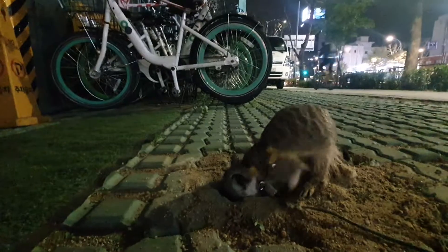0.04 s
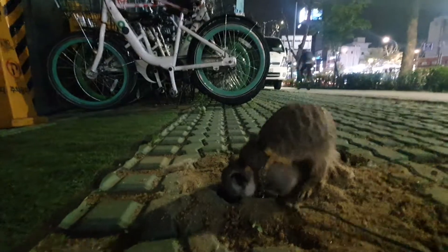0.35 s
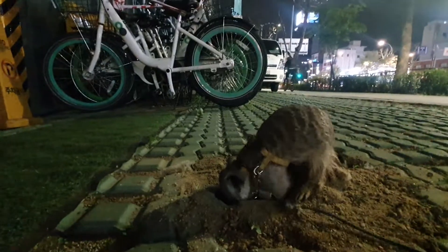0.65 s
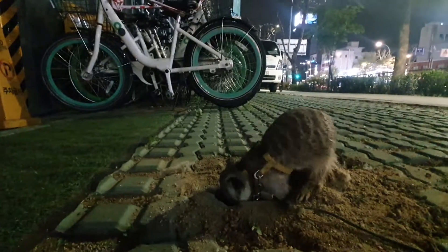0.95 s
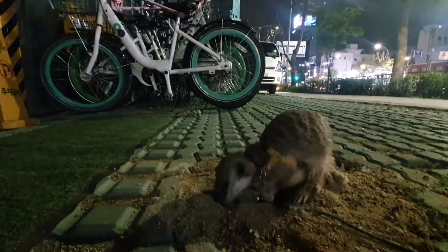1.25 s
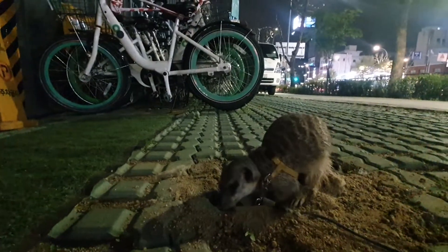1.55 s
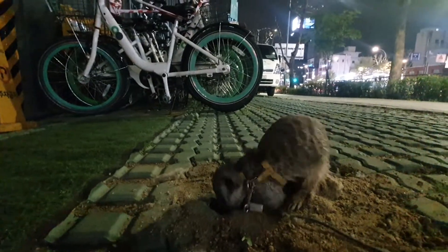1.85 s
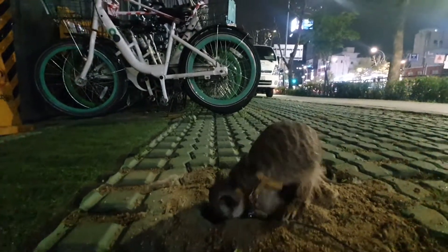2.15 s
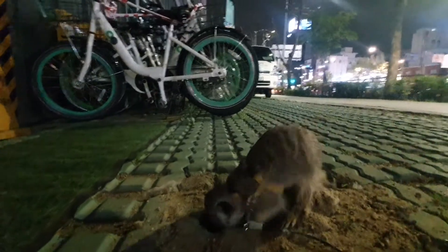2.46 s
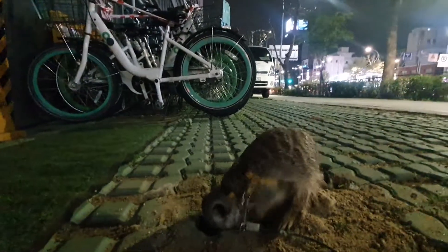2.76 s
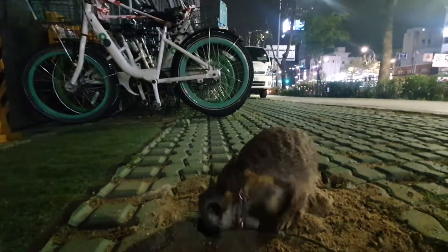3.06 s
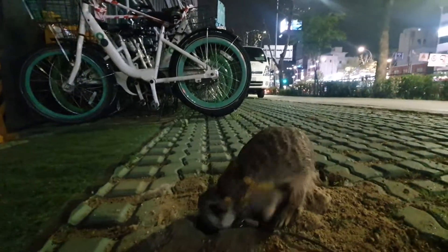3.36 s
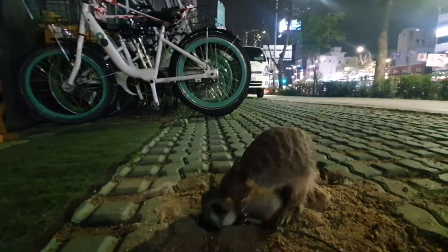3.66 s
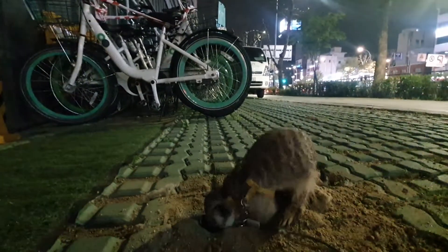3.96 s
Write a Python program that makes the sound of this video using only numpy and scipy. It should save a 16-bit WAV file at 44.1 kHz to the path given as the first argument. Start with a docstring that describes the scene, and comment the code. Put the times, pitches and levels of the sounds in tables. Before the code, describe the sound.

A meerkat digs in sand close by, slightly to the right, with soft, irregular paw sweeps and ticking grit. It gives three short, soft, arching calls at about 0.9, 1.2 and 1.5 seconds. Small clods crunch from 1.6 seconds, and the digging grows busier from 3 seconds, with the strongest claw scrapes near the end. A harness clip occasionally tinkles faintly. Distant traffic and a low, wavering engine drone continue throughout.

```python
"""A meerkat digs in a patch of sand close to a stereo microphone, beside a city street at night.
It gives three short, soft calls that arch in pitch and echo briefly off the paving and a wall.
Its paws sweep the sand, its claws scrape, flick grit and break clods, and its harness clip tinkles.
Distant traffic and a low engine drone lie under everything."""
import sys
import numpy as np
from scipy import signal
from scipy.fft import rfft, irfft
from scipy.io import wavfile
from scipy.ndimage import uniform_filter1d

SR = 44100
rng = np.random.default_rng(int(sys.argv[2]) if len(sys.argv) > 2 else 0)


def transcribe(signal):
    """Save signal, clipped to [-1, 1], as a 16-bit WAV file at the path in sys.argv[1]."""
    frames = np.atleast_2d(signal).T
    limited = np.clip(frames, -1, 1)
    pcm = np.round(limited * 32767).astype(np.int16)
    wavfile.write(sys.argv[1], SR, pcm)


N = 176400
TIME = np.arange(N) / SR
SAND_LIKENESS = 0.16  # left-right correlation of grains and snaps

# Tone of fine sand, swept or trickling: frequency_hz, gain_db
FINE_SAND_TONE = [(300, -51), (2000, -15), (5000, -12), (9000, -9), (10500, -4), (12000, -3), (14000, -4),
                  (16000, 3)]


def amp(db):
    """Decibels to gain."""
    return 10 ** (np.asarray(db) / 20)


def unit(x):
    """Scales to rms 1."""
    return x / np.sqrt(np.mean(x ** 2) + 1e-20)


def read(points, hz):
    """Reads a spectrum on a log-frequency axis."""
    f, value = np.transpose(points)
    return np.interp(np.log(hz + 1), np.log(f + 1), value)


def colour(x, points):
    """Minimum-phase filter of energy 1 with the given spectral shape."""
    gain = amp(read(points, abs(np.fft.fftfreq(2048, 1 / SR))))
    response = np.exp(np.conj(signal.hilbert(np.log(gain))))
    taps = np.fft.ifft(response).real[:1024]
    return signal.oaconvolve(x, taps[None] / np.linalg.norm(taps), axes=1)[:, :N]


def pan(side_db):
    """Left and right gains of mean power 1; side_db is left minus right."""
    gains = amp(np.array([np.atleast_1d(side_db), -np.atleast_1d(side_db)]) / 2)
    return gains / np.sqrt((gains ** 2).mean(0))


def pair(noise, likeness):
    """Gives two unrelated channels the correlation `likeness`."""
    c = np.clip(likeness, -1, 1)
    return np.array([noise[0], c * noise[0] + np.sqrt(1 - c ** 2) * noise[1]])


def drift(rate_hz):
    """Smooth random wander of rms 1."""
    lowpass = np.exp(-(np.fft.rfftfreq(N, 1 / SR) / rate_hz) ** 2)
    return unit(irfft(rfft(rng.standard_normal(N)) * lowpass, N))


def gate(start, length, rise_s, fall_s):
    """Smooth attack, hold and release."""
    attack = np.sin(np.pi / 2 * np.clip((TIME - start) / rise_s, 0, 1))
    release = np.sin(np.pi / 2 * np.clip((start + length - TIME) / fall_s, 0, 1))
    return attack * release


def traffic():
    """Distant traffic: a dull wash with drifting patches, alike in both channels only in the bass."""
    tone = [(20, -27), (36, -10), (50, 4), (75, 3), (110, -3), (170, -9), (230, -5), (330, -12.5),
            (420, -16), (620, -17.5), (850, -22), (1200, -25.5), (2200, -30.5), (3200, -38), (5000, -45),
            (8000, -53.5), (16000, -39.5)]  # street spectrum: frequency_hz, gain_db
    likeness = [(30, 0.95), (70, 0.96), (170, 0.96), (350, 0.74), (700, 0.22), (1400, -0.43), (3000, 0.035),
                (16000, -0.94)]  # left-right likeness: frequency_hz, correlation
    sides = [(100, 0), (350, 0.5), (700, -1), (1400, -3), (2800, -7), (8000, -4), (16000, 9)]  # stereo balance: frequency_hz, side_db
    hz = np.fft.rfftfreq(4096, 1 / SR)
    real, imag = rng.standard_normal((2, 2, N // 1024 + 5, len(hz)))
    slow_noise = uniform_filter1d(rng.standard_normal(real.shape[1:]), size=5, axis=0)
    patches_db = unit(uniform_filter1d(slow_noise, size=30, axis=1))
    noise = pair(real + 1j * imag, read(likeness, hz))
    frames = noise * pan(read(sides, hz))[:, None] * amp(read(tone, hz) + patches_db)
    wash = signal.istft(frames.transpose(0, 2, 1), nperseg=4096, noverlap=3072)[1][:, :N]
    return amp(-43) * unit(wash)


def engine_drone():
    """A low engine note that wavers in pitch and level."""
    levels = [(0.0, -48), (0.36, -38), (0.48, -72), (0.58, -37), (0.83, -61), (1.1, -34.5), (1.45, -41.5),
              (1.74, -30), (1.8, -43), (1.96, -31.5), (2.04, -47), (2.1, -33), (2.43, -38.5), (3.27, -41),
              (3.42, -32), (3.52, -42.5), (4.0, -43.5)]  # swells of the engine: time_s, relative_level_db
    pitch_hz = 54.67 * (1 + 0.056 * drift(13.2))
    phase = 2 * np.pi * np.cumsum(pitch_hz) / SR
    level_db = np.interp(TIME, *np.transpose(levels)) - 3
    return amp(level_db) * np.sqrt(2) * np.sin(phase)


def harness_clip(decay_s=0.009):
    """The small metal clip of the harness rings briefly, now and then, as the animal moves."""
    tinkles = [(0.137, -58, 10200), (2.333, -58, 9550), (2.842, -59, 9550), (3.521, -52.5, 10300),
               (3.536, -59, 9700)]
    out = np.zeros(N)
    for start, db, hz in tinkles:
        t = TIME[TIME >= start] - start
        out[-len(t):] += amp(db) * np.exp(-t / decay_s) * np.sin(2 * np.pi * hz * t)
    return out


def grains(per_s, spread_db=2.6):
    """Sand grains: random clicks of uneven size in both channels."""
    size = amp(spread_db * np.minimum(rng.exponential(1, N), 5))
    hits = rng.random(N) < per_s / SR
    return unit(size * hits * pair(rng.standard_normal((2, N)), SAND_LIKENESS))


def fine_grains(per_s, width_hz=1100):
    """Fine grains of many sizes, each size ringing for an instant at its own pitch."""
    pitches_hz = np.arange(2500, 15500, width_hz)
    out = np.zeros((2, N))
    for hz in pitches_hz:
        clicks = grains(per_s / len(pitches_hz), spread_db=2.3)
        out += signal.lfilter(*signal.iirpeak(hz, hz / width_hz, SR), clicks)
    return unit(out)


def trickle():
    """A little loose sand keeps trickling, heard between the strokes."""
    levels = [(0, -69), (.6, -65.5), (.8, -71.5), (1.4, -65.5), (1.8, -61.5), (2.4, -69), (2.9, -61),
              (3.2, -63.5), (4, -60.5)]  # flow of loose sand: time_s, level_db
    level_db = np.interp(TIME, *np.transpose(levels)) + 2 * drift(27)
    return colour(amp(level_db) * fine_grains(per_s=4600), FINE_SAND_TONE)


def snap(start, db, side_db, tone, decay_s):
    """One fast-dying burst of fracture noise."""
    t = TIME[:SR // 20]
    fade = np.exp(-t / decay_s)
    burst = colour(fade * pair(rng.standard_normal((2, len(t))), SAND_LIKENESS), tone)
    burst *= np.linalg.norm(fade) / np.linalg.norm(burst, axis=1, keepdims=True)
    placed = np.pad(burst, ((0, 0), (round(start * SR), N)))[:, :N]
    return pan(side_db) * amp(db) * placed


def grit():
    """Claws flick hard grit, which ticks brightly."""
    ticks = [(0.201, -54, 10), (0.22, -54, 9), (0.236, -48, -21), (0.48, -53, 12), (.667, -56, 10),
             (0.674, -52.5, 12), (1.472, -52, -22), (1.675, -45.5, -8), (1.723, -59, -11),
             (1.910, -51, -21), (1.936, -41.5, -15), (1.966, -41.5, -15), (2.055, -44.5, -4),
             (2.0656, -51, -7), (2.078, -50.5, -17), (2.113, -58, -8), (2.154, -54, -14),
             (2.1814, -45.5, 2), (2.5235, -55, 7), (2.531, -52.5, 1), (3.0764, -38.5, -6.5),
             (3.105, -52, 0), (3.239, -54.5, 1), (3.286, -52, 7), (3.3964, -57, -15), (3.7848, -44.5, -9),
             (3.839, -54, -7), (3.844, -54, -7), (3.924, -41, -12), (3.932, -42, -18), (3.9464, -50, -9),
             (3.958, -56, -12)]  # flicked grit: start_s, relative_level_db, side_db
    tone = [(500, -53), (2000, -43), (3500, -12.5), (5500, -14.5), (8000, -12), (10500, -1.5), (12500, -1),
            (16000, -3)]  # spectrum of a tick: frequency_hz, gain_db
    return sum(snap(start, db + 10, side_db, tone, decay_s=0.0012) for start, db, side_db in ticks)


def clods():
    """Claws break small clods, each with its own dull ring."""
    # Breaking clods: start_s, relative_level_db, decay_s, ring_hz, side_db
    crunches = [(1.593, -47.5, 0.0092, 2920, -7), (1.603, -50.5, 0.0048, 3220, -9),
                (1.61, -42.5, 0.0014, 2510, -2), (1.619, -51.5, 0.0085, 3300, -9),
                (1.725, -45.5, 0.0018, 2840, -13), (1.849, -50.5, 0.0037, 3980, -22),
                (1.9426, -46, 0.0016, 3270, -15), (1.9453, -42.5, 0.002, 2400, -14),
                (2.1805, -43, 0.0014, 3900, -3), (2.879, -51, 0.004, 2600, -9),
                (2.887, -46.5, .007, 3150, -10), (3.784, -44.5, 0.0027, 2580, -8),
                (3.789, -47, 0.0041, 2350, -20)]
    tone = [(.1, -12), (.5, -19), (.8, -6), (1, 0.5), (1.25, -11), (1.6, -20.5), (2.4, -26), (6, -30)]  # spectrum of a clod: multiple_of_ring_pitch, gain_db
    return sum(snap(start, db + 1, side_db, np.multiply(tone, [ring_hz, 1]), decay_s)
               for start, db, decay_s, ring_hz, side_db in crunches)


def stroke_power(start, length, db):
    """The power of one paw or claw stroke swells and dies away."""
    return (amp(db) * gate(start, length, rise_s=0.26 * length, fall_s=0.45 * length)) ** 2


def digging(grains_per_s=9000):
    """Close by on the right, paws set clumps of fine and coarse sand sliding and claws scrape."""
    strokes = [(0.095, 0.056, -63, -16), (0.159, 0.11, -58, -6), (0.28, 0.14, -66, 8),
               (0.438, 0.084, -59.5, -0.5), (0.502, 0.15, -65, -10), (0.661, 0.033, -58.5, 1),
               (0.786, 0.039, -61, -15), (1.032, 0.051, -64, -19), (1.228, 0.093, -58.5, -1),
               (1.584, 0.057, -50.5, -5), (1.705, 0.077, -68, 14), (1.793, 0.053, -56.5, 2),
               (1.841, 0.036, -56, 1), (2.016, 0.053, -59, 3), (2.075, 0.062, -61.5, 6),
               (2.174, 0.032, -56.5, -15), (2.279, 0.15, -60, 0), (2.544, 0.11, -53.5, -27),
               (2.726, 0.064, -55, -1.5), (2.814, 0.24, -61.5, 6), (2.961, 0.056, -45, -7),
               (3.057, 0.16, -58, -1), (3.268, .11, -53.5, 1.5), (3.452, 0.084, -51.5, -5),
               (3.506, 0.22, -59, -3), (3.575, 0.058, -59.5, 11), (3.626, 0.24, -58, 4),
               (3.783, 0.016, -49, 4), (3.786, 0.093, -59, 6.5), (3.822, 0.16, -51.5, 4.5)]  # paw strokes: start_s, length_s, level_db, relative_coarse_db
    scrapes = [(1.723, 0.0053, -50), (2.877, 0.014, -48.5), (2.969, 0.037, -52.5), (3.7835, .004, -44),
               (3.79, 0.0052, -44), (3.855, 0.031, -43.5), (3.888, 0.023, -39.5), (3.907, 0.053, -46)]  # claws dragging over hard ground: start_s, length_s, level_db
    coarse_tone = [(100, -43), (500, 6), (1400, 4.5), (2400, 1), (3600, 0.5), (5000, -2), (6500, -6),
                   (8000, -7.5), (10000, -4.5), (16000, -19)]  # spectrum of coarse sand: frequency_hz, gain_db
    scrape_tone = [(500, -5.5), (1300, -1), (2400, -3), (3600, -22.5), (4500, -4.5), (5300, -4), (6200, 1),
                   (7200, -2.5), (8200, -9), (10000, -5), (11800, -3), (14500, -3)]  # spectrum of a scrape: frequency_hz, gain_db
    fine_power, coarse_power = np.zeros((2, N))
    for start, length, db, coarse_db in strokes:
        fine_power += stroke_power(start, length, db)
        coarse_power += stroke_power(start, length, db + coarse_db - 6.5)
    claw_power = sum(stroke_power(*scrape) for scrape in scrapes)
    layers = [(fine_power, fine_grains(grains_per_s), FINE_SAND_TONE),
              (coarse_power, grains(grains_per_s), coarse_tone),
              (claw_power, grains(grains_per_s), scrape_tone)]
    sliding = np.zeros((2, N))
    for power, sand, tone in layers:
        clumps = unit(amp(2.5 * drift(rate_hz=88)))
        sliding += colour(np.sqrt(power) * clumps * sand, tone)
    return pan(side_db=-7.5) * sliding


def with_echo(voice, decay_s=0.014):
    """The paving and the nearby wall add a brief, dull echo to the voice."""
    t = TIME[:SR // 8]
    taps = rng.standard_normal((2, len(t))) * np.exp(-t / decay_s) * (1 - np.exp(-2 * t / decay_s))
    echo = signal.oaconvolve(voice, taps / np.linalg.norm(taps[0]), axes=1)[:, :N]
    return voice + amp(-17.5) * signal.lfilter(*signal.butter(1, 4000, fs=SR), echo)


def meerkat_calls():
    """A clear, close voice arches in pitch; overtones swell after the fundamental, with a little hiss."""
    # Calls: start_s, length_s, level_db, top_pitch_hz, pitch_sag_share,
    # relative_second_harmonic_db, relative_upper_harmonics_db, right_port_lag_s
    calls = [(0.938, 0.0576, -43, 933, 0.029, -16.5, -10, .00043),
             (1.165, 0.063, -41.5, 954, 0.13, -12, -4, 0.00035),
             (1.484, 0.062, -43, 957, 0.14, 0, 0.5, .00018)]
    throat = [(850, 1), (1900, 1), (2650, 0), (2900, -4.5), (3700, -27.5), (4700, -22.5), (5600, -43),
              (6700, -19.5), (8400, -32), (9400, -16), (10400, -38), (12000, -16), (13500, -31)]  # resonances of the throat: frequency_hz, gain_db
    sides = [(950, -2), (1900, -12), (2800, -15), (6500, -24), (12000, -1)]  # stereo balance of the voice: frequency_hz, side_db
    breath_tone = [(800, -6), (2800, -2), (4500, -4), (8500, -3), (12000, 1), (16000, -17)]  # hiss of air in the voice: frequency_hz, gain_db
    peak = 0.567  # share of the call at which the pitch tops out
    jitter, rasp = 0.0062 * drift(170), 0.016 * drift(820)
    shimmer = amp(1.1 * drift(150))
    hiss = rng.standard_normal((2, N))
    voice, breath = np.zeros((2, 2, N))
    for start, length, db, top_hz, sag, second_db, upper_db, lag_s in calls:
        on = (TIME >= start) & (TIME < start + length)
        progress = (TIME[on] - start) / length
        effort = amp(db) * (shimmer * gate(start, length, rise_s=0.033, fall_s=0.0056))[on]
        before_peak = np.sin(np.pi / 2 * (1 - progress / peak))
        from_peak = np.where(progress < peak, before_peak, (progress - peak) / (1 - peak))
        hz = top_hz * (1 - sag * from_peak ** 2 + jitter[on] + rasp[on])
        phase = 2 * np.pi * np.cumsum(hz) / SR
        swell = amp(-9 * from_peak ** 2)
        puffs = 1 + np.cos(phase)  # the hiss pulses once a cycle
        breath[:, on] += hiss[:, on] * effort * swell * amp(upper_db - 21) * puffs
        port_phases = np.array([phase, phase - 2 * np.pi * hz * lag_s])
        for k in range(1, 15):
            weight = 1 if k == 1 else swell * amp(second_db if k == 2 else upper_db)
            harmonic = amp(read(throat, k * hz)) * weight * effort * np.cos(k * port_phases)
            voice[:, on] += pan(read(sides, k * hz)) * harmonic
    return voice + pan(side_db=5) * colour(breath, breath_tone)


def scene():
    """The meerkat close to the microphone, the street far behind it."""
    meerkat = with_echo(meerkat_calls()) + digging() + trickle() + grit() + clods() + harness_clip()
    return meerkat + traffic() + engine_drone()


def record(dry):
    """Each microphone port colours the treble in its own way; a steep low-pass limits the band."""
    ports = [(5500, -0.5), (7400, -4.5), (8300, 3.5), (9200, 3.5), (10200, 13), (11200, -0.5), (12800, -4),
             (16000, -5)]  # imbalance of the two ports: frequency_hz, side_db
    port_gains = pan(read(ports, np.fft.rfftfreq(N, 1 / SR)))
    ported = irfft(rfft(dry) * port_gains, N)
    lowpass = signal.firwin(511, cutoff=15850, window=("kaiser", 9), fs=SR)
    return signal.oaconvolve(ported, lowpass[None], "same")


dry = scene()
out = record(dry)
transcribe(out)
```